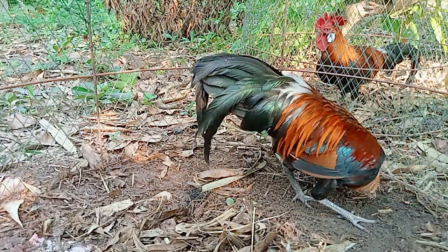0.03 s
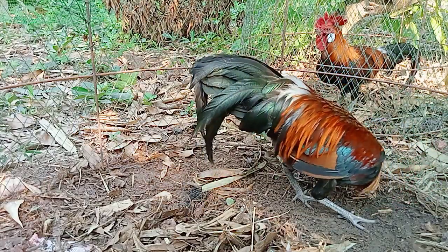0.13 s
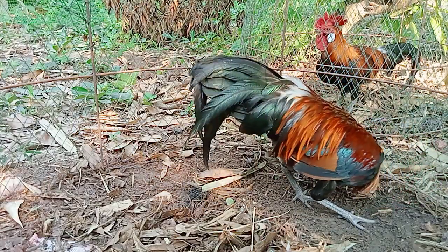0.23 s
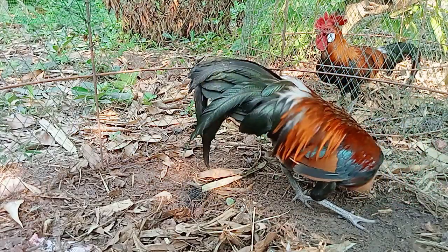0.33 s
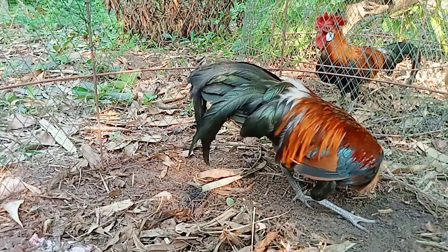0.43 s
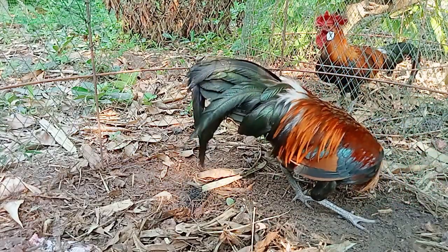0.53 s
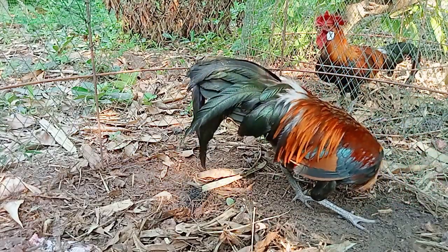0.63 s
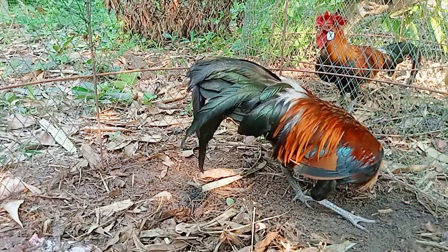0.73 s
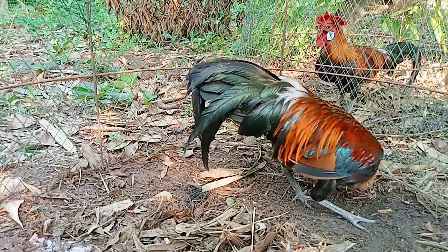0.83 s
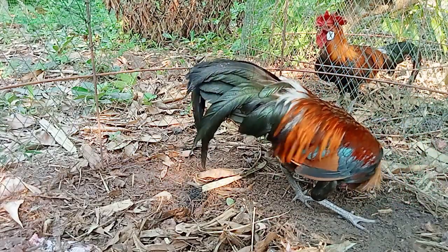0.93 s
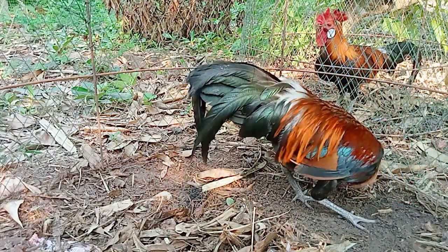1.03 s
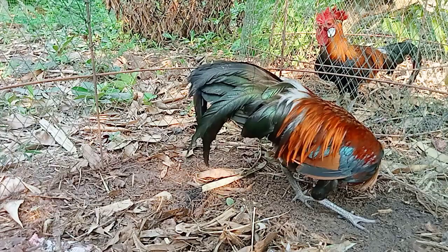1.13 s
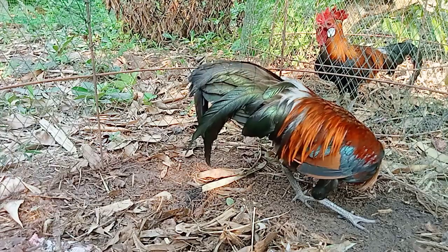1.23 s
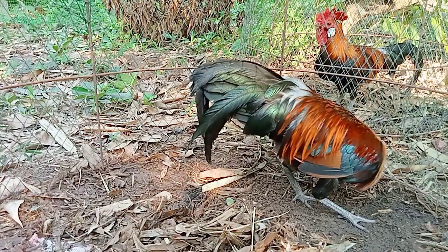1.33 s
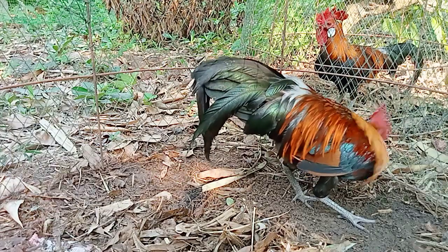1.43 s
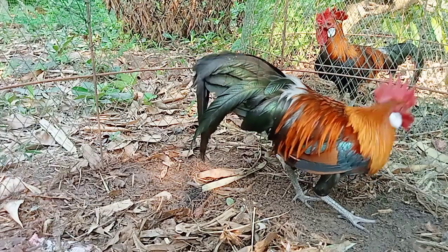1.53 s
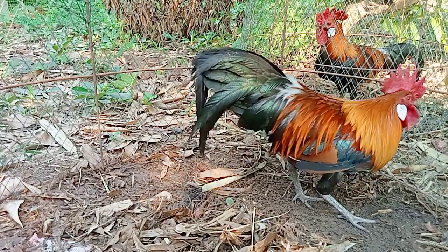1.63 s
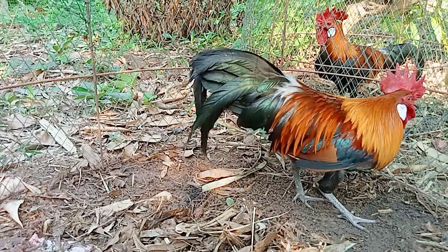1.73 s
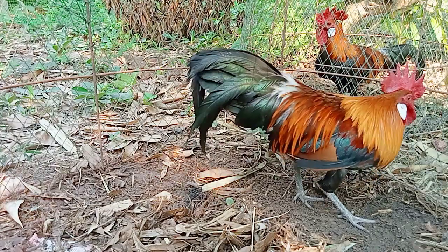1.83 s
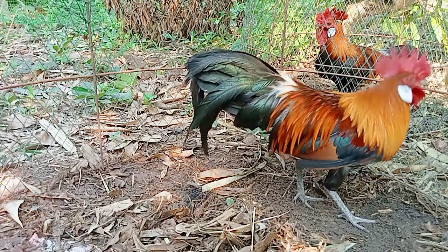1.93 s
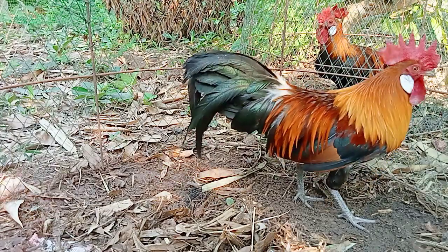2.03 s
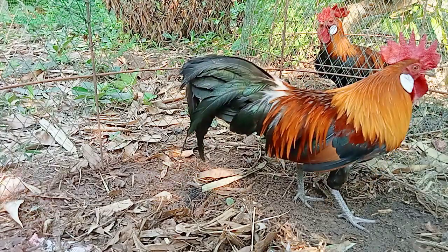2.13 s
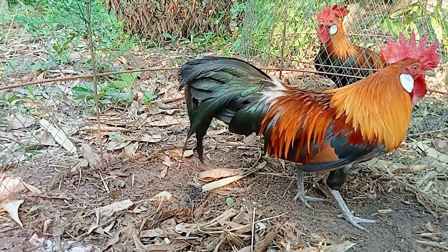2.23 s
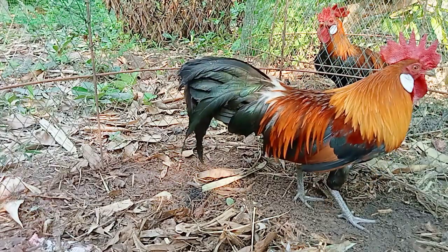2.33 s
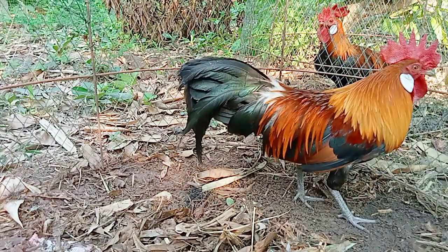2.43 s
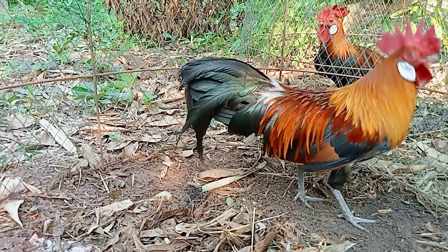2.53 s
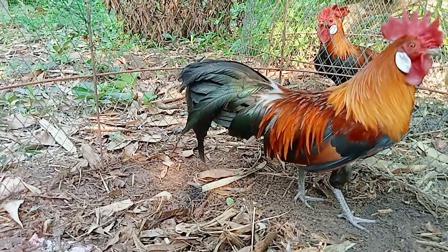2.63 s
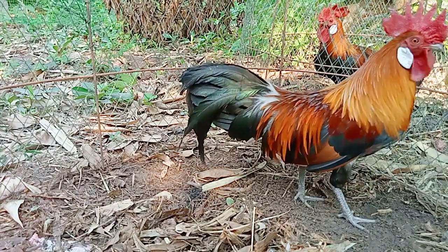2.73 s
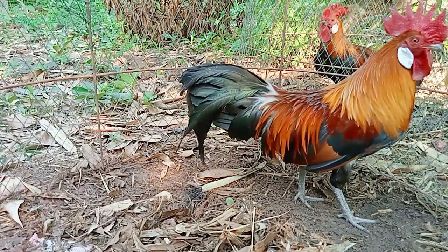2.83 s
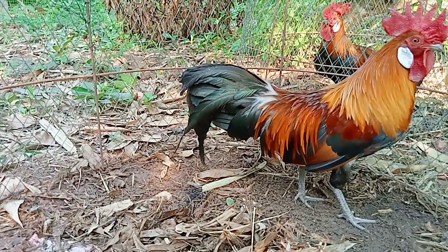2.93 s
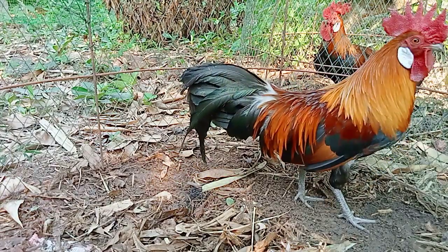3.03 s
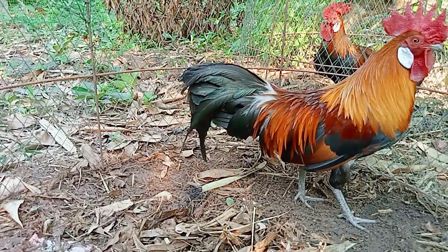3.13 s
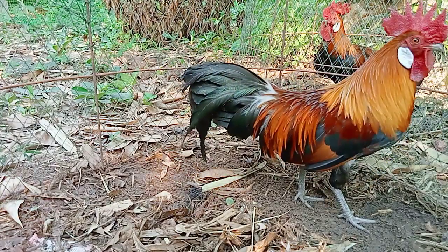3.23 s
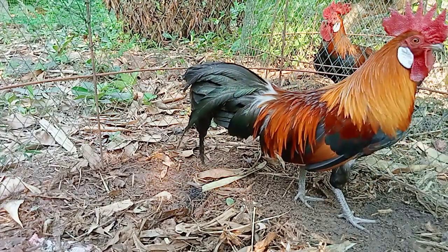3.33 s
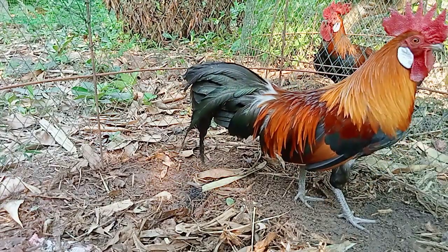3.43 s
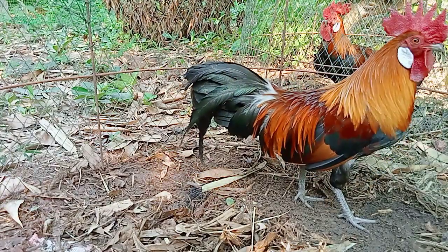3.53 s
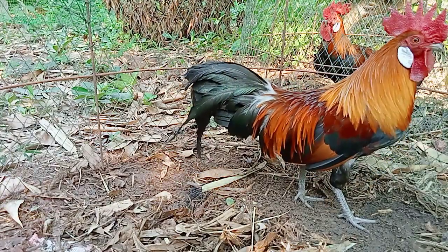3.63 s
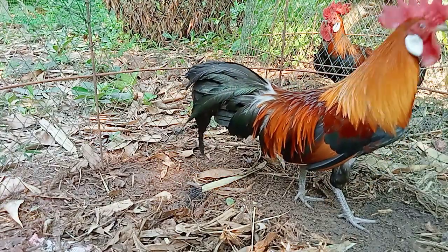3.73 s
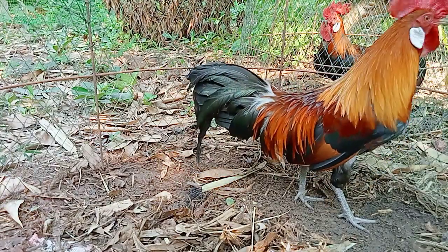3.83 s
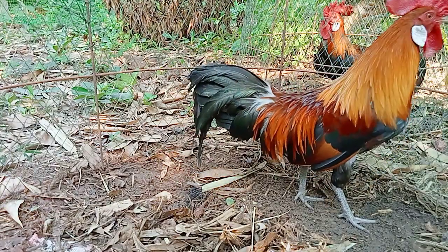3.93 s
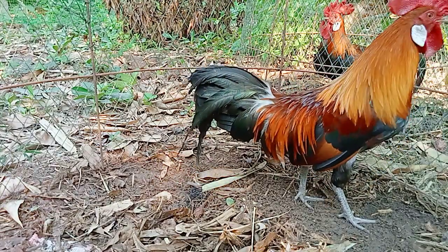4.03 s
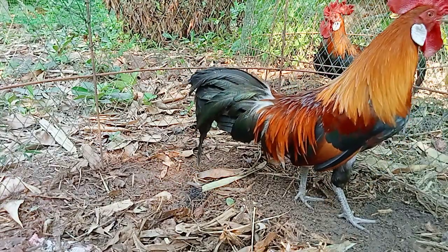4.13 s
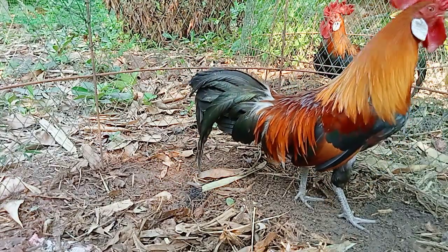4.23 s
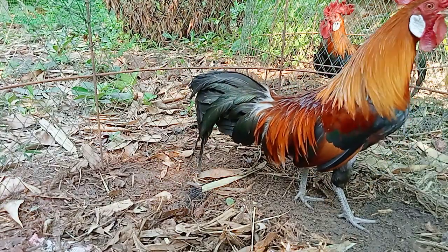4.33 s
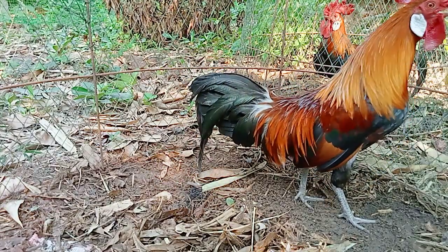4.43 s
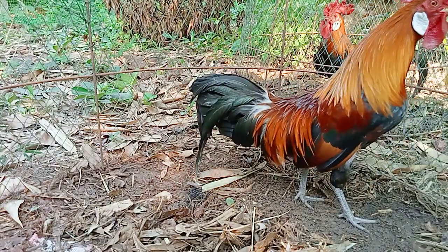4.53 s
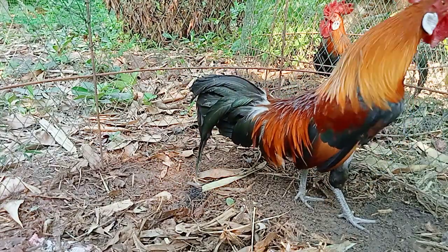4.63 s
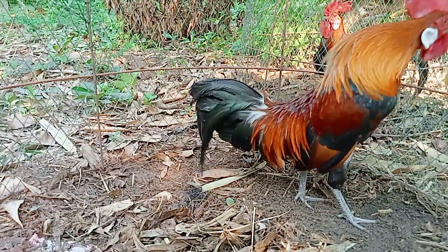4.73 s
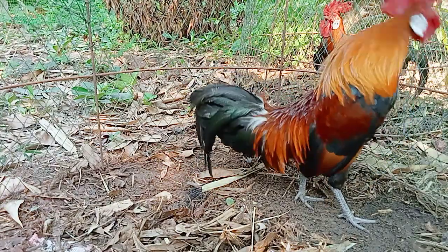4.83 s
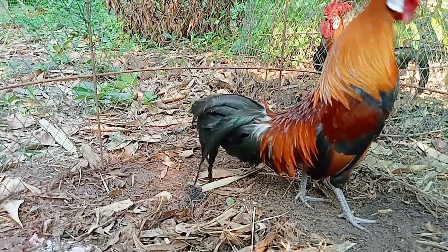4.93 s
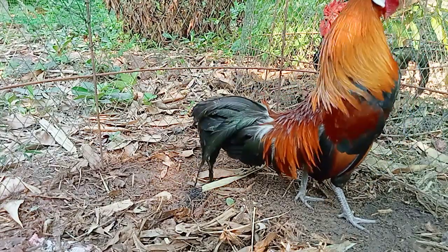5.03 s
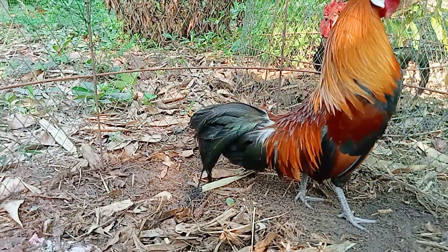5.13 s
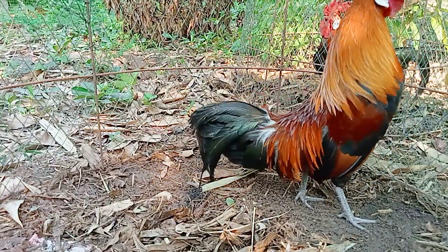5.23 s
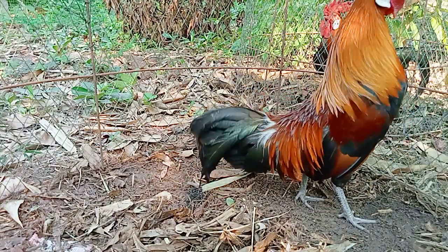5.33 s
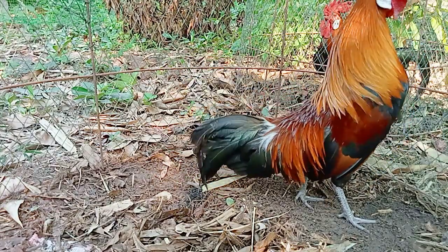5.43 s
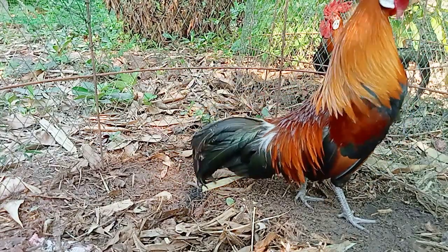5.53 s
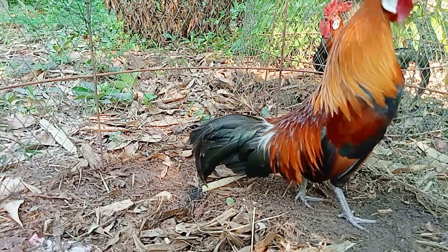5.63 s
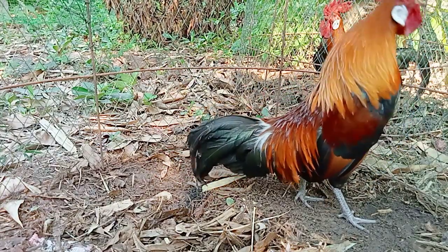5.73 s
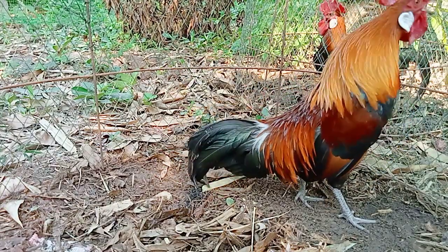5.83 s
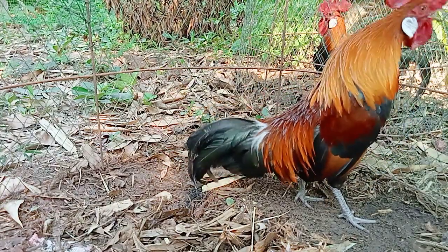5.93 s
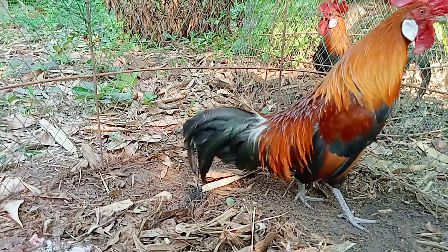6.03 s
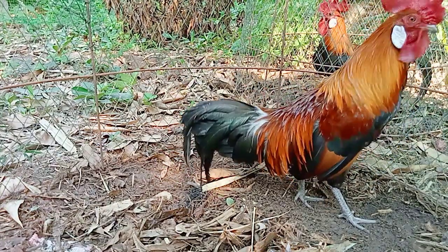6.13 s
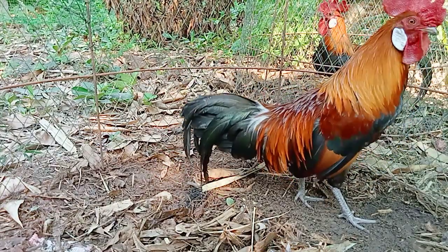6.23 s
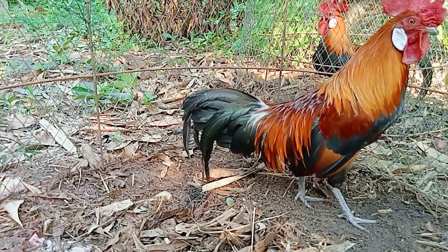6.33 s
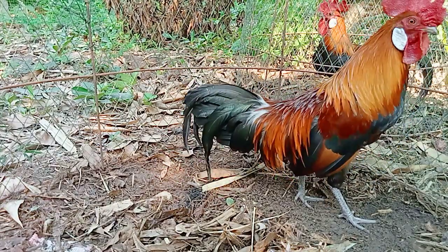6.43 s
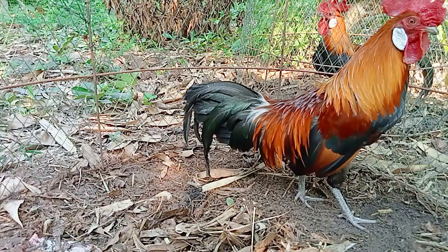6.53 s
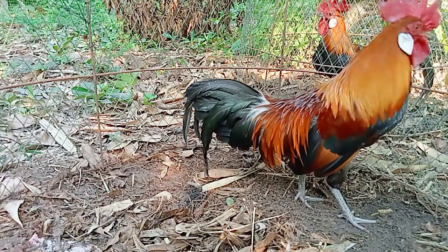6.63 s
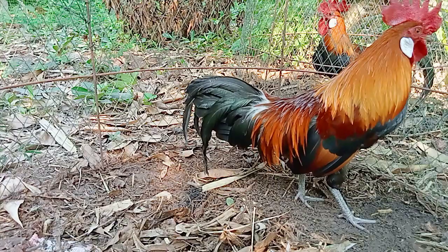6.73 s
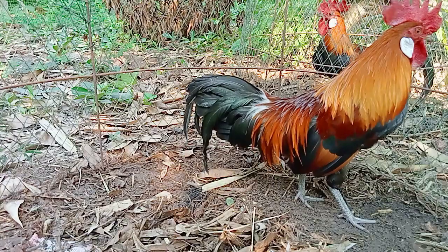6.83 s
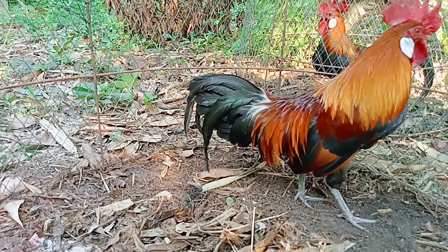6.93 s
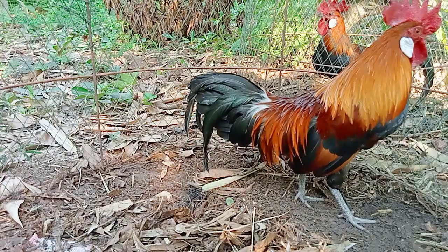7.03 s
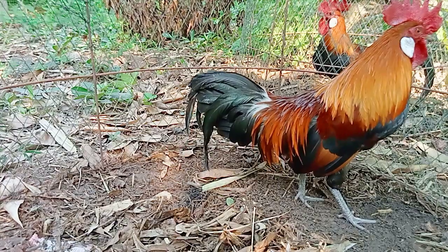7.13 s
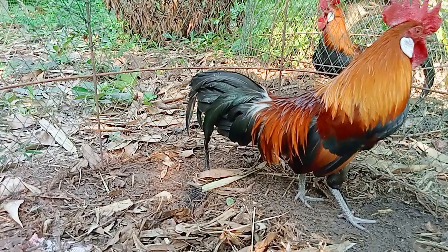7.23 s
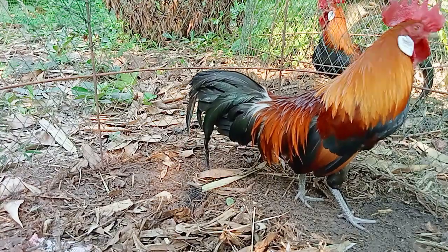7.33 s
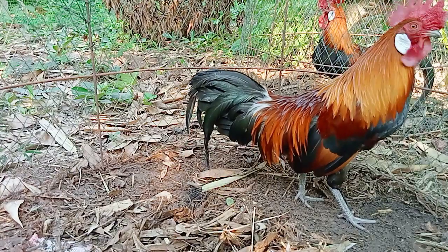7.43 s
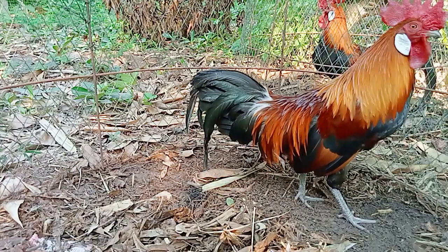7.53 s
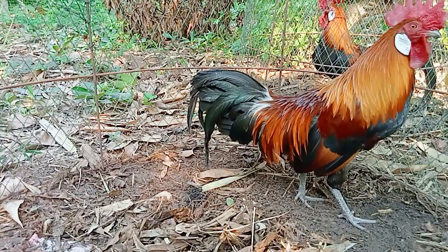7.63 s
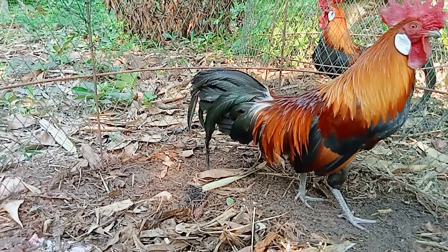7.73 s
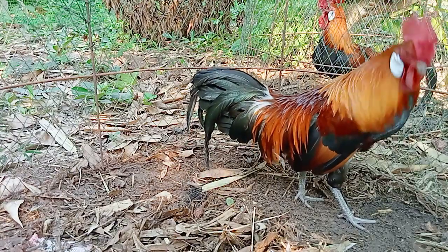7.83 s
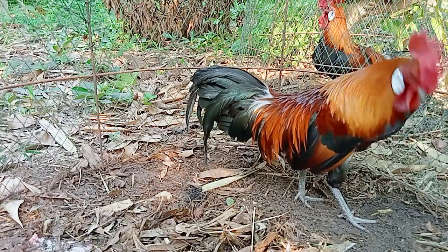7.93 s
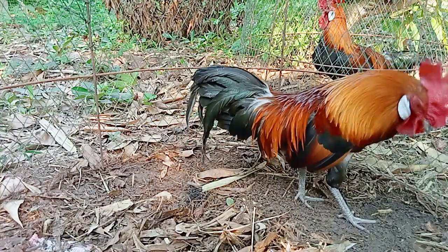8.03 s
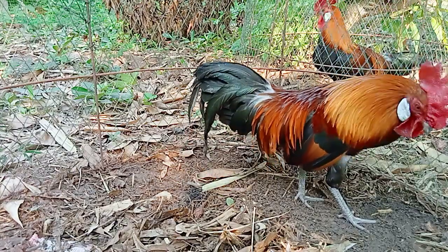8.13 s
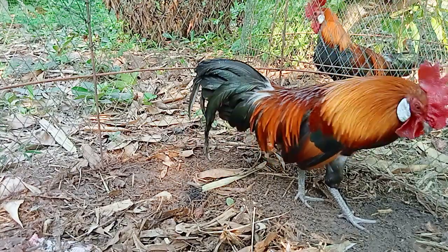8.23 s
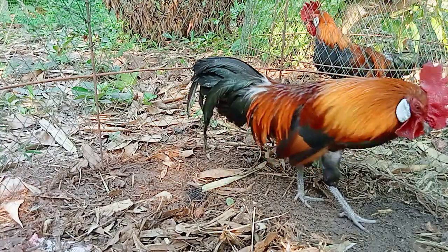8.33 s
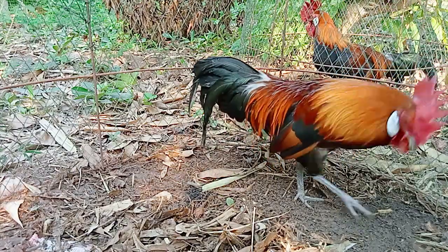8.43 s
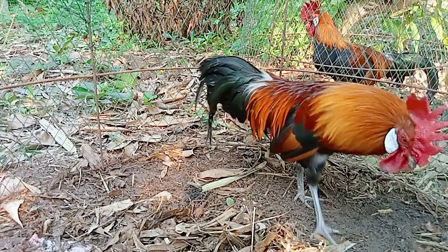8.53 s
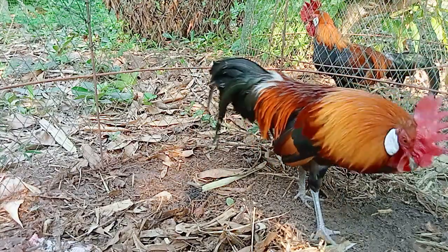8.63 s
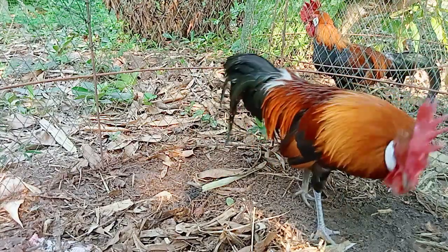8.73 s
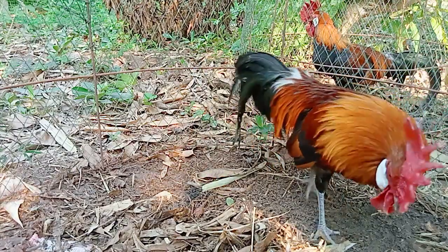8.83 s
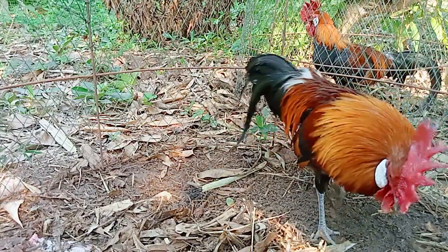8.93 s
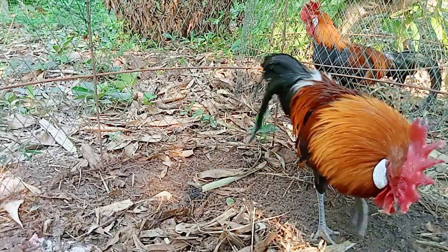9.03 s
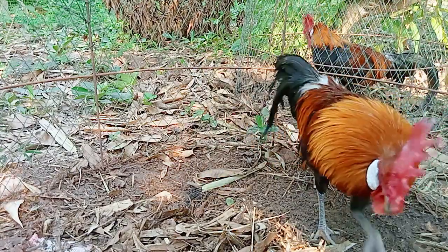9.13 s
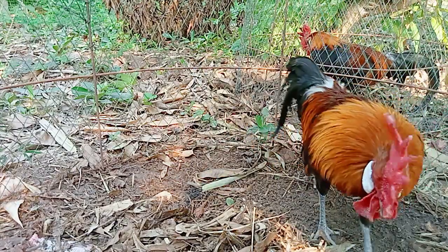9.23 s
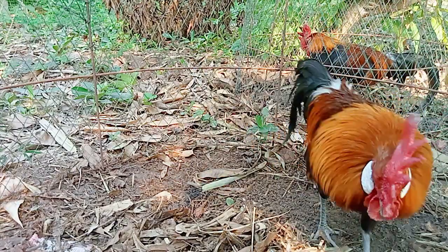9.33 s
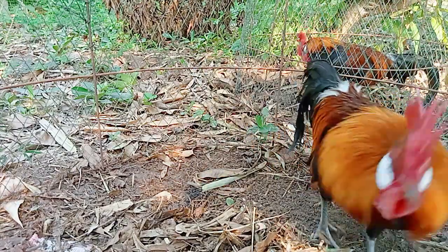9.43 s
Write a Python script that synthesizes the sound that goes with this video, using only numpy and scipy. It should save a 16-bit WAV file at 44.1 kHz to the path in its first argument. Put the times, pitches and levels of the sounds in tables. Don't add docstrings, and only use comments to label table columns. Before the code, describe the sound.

Outdoor garden pen, heard by a phone close to a rooster. Leafy hiss and low wind thumps come first, then a hen further off rises into a long hoarse note and cackles steadily. The near rooster bursts out four loud clipped notes, flipping between whistle and rasp. The background drops and stays quieter; a far rooster answers with three echoing notes among soft clucks, small chirps and leaf ticks.

```python
import sys
import numpy as np
from scipy import signal
from scipy.fft import rfft, irfft
from scipy.io import wavfile
from scipy.ndimage import uniform_filter1d

SR = 44100
rng = np.random.default_rng(int(sys.argv[2]) if len(sys.argv) > 2 else 0)


def inscribe(sig):
    pcm = np.round(np.clip(np.atleast_2d(sig).T, -1, 1) * 32767)
    wavfile.write(sys.argv[1], SR, pcm.astype(np.int16))


def volts(x):
    e = np.asarray(x, float) / 20
    return 10 ** e


N = 418068
TOP_HZ = 15450


def colour(x, shape):
    hz, db = np.transpose(shape)
    grid = np.maximum(np.arange(1025) * SR / 2048, 1)
    log_gain = np.interp(np.log(grid), np.log(hz), db) * np.log(10) / 20
    cepstrum = irfft(log_gain)
    cepstrum[1:1024] *= 2
    cepstrum[1025:] = 0
    response = irfft(np.exp(rfft(cepstrum)))
    return signal.fftconvolve(x, response)[:len(x)]


def unit(x):
    return x / np.sqrt(np.mean(x ** 2))


def walk(rate, size):
    hold = max(int(SR / rate), 1)
    levels = np.repeat(rng.standard_normal(size // hold + 1), hold)
    return unit(uniform_filter1d(uniform_filter1d(levels, hold), hold)[:size])


def follow(curve):
    return np.interp(np.arange(N) / SR, *np.transpose(curve))


def columns(note):
    times, *cols = np.transpose(note)
    at = np.arange(int(times[0] * SR), min(int(times[-1] * SR), N))
    return at, [np.interp(at / SR, times, col) for col in cols]


def band(x, lo_hz, hi_hz):
    return signal.sosfiltfilt(signal.butter(3, [lo_hz, hi_hz], "band", fs=SR, output="sos"), x)


def tail(x, t60, wet_db, echo_s, echo_db):
    t = np.arange(SR) / SR
    scattered = np.exp(-np.log(1000) * t / t60) * np.minimum(t / 0.028, 1)
    slap = volts(echo_db) * np.exp(-((t - echo_s) / 0.0061) ** 2)
    echoes = rng.standard_normal(SR) * (scattered + slap)
    return volts(wet_db) * signal.fftconvolve(x, echoes / np.sqrt(np.sum(echoes ** 2)))[:N]


def voice(hz, db, rasp, half, neck, throats, jitter, scatter, shimmer, breath):
    n = len(hz)
    rasp = rasp * volts(1.7 * walk(70, n))
    wobble = walk(700, n) + .7 * np.minimum(rasp, .6) * walk(160, n)
    phase = 2 * np.pi * np.cumsum(hz * (1 + jitter * rasp * wobble)) / SR
    phase = phase + scatter * rasp * walk(1300, n)
    phase = phase + .6 * half * np.sin(phase / 2)
    pulses = sum(np.cos(k * phase) * (k * hz < TOP_HZ) for k in range(1, 22)) / 3
    pulses = pulses * (1 + half * np.cos(phase / 2))
    pulses = pulses * (1 + shimmer * np.minimum(rasp, .5) * walk(450, n))
    source = pulses + breath * rasp * rng.standard_normal(n)
    sound = 0
    for k, shape in enumerate(throats):
        sound = sound + np.maximum(1 - abs(neck - k), 0) * unit(colour(source, shape))
    loudness = np.sqrt(uniform_filter1d(uniform_filter1d(sound ** 2, size=500), size=500))
    edge = np.minimum(np.minimum(np.arange(n), n - np.arange(n)) / (0.0009 * SR), 1)
    return sound / loudness * volts(db) * edge


def bursts(events, cycles, fall, lag):
    out = np.zeros(N)
    for s, db, hz in events:
        u = np.arange(int(cycles / hz * SR)) * hz / SR / cycles
        wave = np.sin(2 * np.pi * cycles * u * (1 + fall * (1 - u)))
        at = int((s + lag) * SR)
        out[at:at + len(u)] += volts(db) * np.sin(np.pi * u) ** 2 * wave
    return out


def slow_gain_db():
    return np.interp(np.arange(N) / SR, [2.9, 6.6], [0, -5.5])


def traffic():
    hum = colour(rng.standard_normal(N),
                 [(30, -30.5), (70, -9.0), (130, -6.5), (300, -9.0), (600, -10.0), (1500, -31.0)])
    return volts(-59.5) * unit(hum)


def garden():
    # (frequency [Hz], gain [dB])
    hiss_colour = [(88, -30.5), (150, -16.5), (253, -20.5), (381, -16.5), (632, -11), (1030, -13),
                   (1150, -11), (1990, -13), (4680, -6.5), (5250, -8.5), (7170, 2), (8380, -11.5),
                   (9980, -18.5), (12100, -21), (15600, -12.5)]
    # (time [s], level [dB])
    breeze = [(0.0, -2), (0.5, -1), (0.8, -0.5), (1.25, 1), (2.0, 1), (2.7, 1), (3.2, -0.5), (3.55, 0),
              (3.82, 2.5), (4.1, 0), (4.45, 1), (6.3, 1), (6.6, -1), (6.951, 1.5), (7.4, -1.7), (9.16, -1),
              (9.45, 0.5)]
    hiss = unit(colour(rng.standard_normal(N), hiss_colour))
    low = signal.sosfilt(signal.butter(2, 1500, fs=SR, output="sos"), hiss)
    rest = hiss - low
    high = signal.sosfilt(signal.butter(2, 5000, "high", fs=SR, output="sos"), rest)
    middle = rest - high
    flicker = low * volts(1.3 * walk(9, N)) + middle * volts(.8 * walk(11, N)) + high * volts(1.1 * walk(14, N))
    level_db = -39.5 + follow(breeze) + slow_gain_db() + 0.42 * walk(5.9, N)
    return flicker * volts(level_db)


def wind():
    # (time [s], level [dB])
    gusts = [(0.0, -52), (0.4, -53), (1.15, -46), (1.6, -50), (1.95, -56), (2.4, -50), (3.25, -44.5),
             (3.72, -47), (4.25, -52), (4.65, -58.5), (5.25, -72), (6.071, -72), (6.4, -62), (9.48, -57.5)]
    # (time [s], peak level [dB], pitch [Hz])
    thumps = [(0.088, -35, 99), (0.387, -35, 111), (0.619, -39, 114), (0.652, -40, 109), (0.698, -30, 111),
              (0.741, -29, 103), (0.845, -34, 114), (0.87, -43, 100), (0.968, -35, 97), (1.017, -43, 101),
              (1.042, -34, 97), (1.07, -33, 86), (1.11, -31, 95), (1.143, -37, 96), (1.241, -38, 89),
              (1.34, -40, 102), (1.449, -42, 90), (1.506, -40, 88), (1.58, -33, 96), (1.606, -37, 114),
              (1.719, -38, 113), (1.776, -36, 102), (1.797, -43, 91), (1.832, -39, 91), (2.047, -37, 87),
              (2.094, -36, 102), (2.179, -38, 108), (2.301, -36, 79), (2.366, -34, 140), (2.589, -34, 93),
              (2.679, -26, 108), (2.73, -35, 105), (2.773, -38, 110), (2.804, -42, 82), (2.849, -41, 81),
              (2.935, -41, 92), (2.959, -38, 93), (2.992, -36, 88), (3.128, -31, 92), (3.153, -35, 87),
              (3.204, -32, 80), (3.253, -32, 100), (3.319, -33, 99), (3.356, -36, 97), (3.382, -39, 94),
              (3.424, -35, 92), (3.513, -34, 79), (3.555, -40, 109), (3.582, -31, 79), (3.615, -35, 96),
              (3.673, -35, 107), (3.702, -29, 111), (3.894, -34, 97), (4.068, -42, 120), (4.159, -35, 87),
              (4.218, -42, 100), (4.322, -40, 86), (4.348, -41, 93), (4.402, -42, 97), (4.553, -42, 87)]
    rumble = colour(rng.standard_normal(N),
                    [(15, -49.5), (40, -11.5), (80, 1.5), (130, -6.5), (220, -15.5), (500, -45.5)])
    level_db = follow(gusts) + slow_gain_db() - 3.5
    level_db = level_db + 3.5 * walk(40, N) + 1.2 * walk(9, N)
    return unit(rumble) * volts(level_db) + bursts(thumps, cycles=2.22, fall=0.082, lag=0.0001)


def ticks():
    # (time [s], peak level [dB])
    snaps = [
        (1.387, -22),
        (1.917, -26),
        (3.7307, -37),
        (6.769, -33),
        (6.9234, -30),
        (7.8629, -34.5),
        (8.786, -23),
        (9.4177, -23),
    ]
    out, t = np.zeros(N), np.arange(800) / SR
    for s, db in snaps:
        crack = rng.standard_normal(len(t)) * np.exp(-t / 0.0044)
        at = int(s * SR)
        out[at:at + len(t)] += volts(db - 17.5) * crack
    return out


def clucks():
    # (time [s], peak level [dB], pitch [Hz])
    mutters = [(1.202, -51, 577), (1.382, -44, 576), (3.898, -44, 510), (4.206, -45, 427),
               (4.584, -43, 450), (6.036, -46.5, 344), (6.798, -46, 684), (7.404, -46.5, 450),
               (8.0, -44, 467), (8.395, -41, 547), (9.352, -42.5, 525)]
    return bursts(mutters, cycles=7.15, fall=0.65, lag=-0.0006)


def birds():
    # (time [s], length [s], first pitch [Hz], last pitch [Hz], peak level [dB])
    glides = [
        (4.674, 0.096, 650, 1095, -61),
        (6.533, 0.08, 1268, 1380, -56),
        (7.506, 0.1, 1560, 1446, -59),
        (7.533, 0.065, 2060, 1790, -62),
        (9.165, 0.045, 1220, 1397, -64.5),
        (6.79, .14, 3920, 3530, -61),
        (7.254, 0.14, 3730, 3450, -60.5),
        (9.226, 0.11, 3900, 3440, -57),
    ]
    out = np.zeros(N)
    for s, length, first, last, peak in glides:
        share = np.array([0, 0.57, 1])
        level_db = peak - 5.5 * np.array([1, 0, 1])
        at, (hz, db) = columns(np.c_[s + length * share, first + (last - first) * share, level_db])
        flutter = 1 + 95 / hz * walk(400, len(at))
        whistle = np.sin(2 * np.pi * np.cumsum(hz * flutter) / SR)
        out[at] += volts(db + 4.5) * (2.0 + walk(141, len(at))) * whistle
    return out + tail(out, t60=.2, wet_db=-7, echo_s=.05, echo_db=-12)


def far_fowl(notes, throat, rasp, scatter, t60, wet_db, echo_db):
    out = np.zeros(N)
    for note in notes:
        at, (hz, db) = columns(note)
        out[at] += voice(hz / 2, db, rasp, .05, 0, [throat], jitter=.05, scatter=scatter, shimmer=.8, breath=.55)
    return out + tail(out, t60, wet_db, 0.031, echo_db)


def far_rooster():
    # (time [s], second harmonic [Hz], level [dB])
    answer = [
        [(7.738, 1450, -51), (7.747, 1698, -45), (7.761, 2177, -37), (7.772, 2310, -37), (7.803, 2160, -37.5),
         (7.82, 1745, -41.5), (7.835, 1560, -40)],
        [(7.921, 1530, -52), (7.928, 1597, -41), (7.944, 2152, -45), (7.956, 2246, -34.5), (8.1, 2180, -37.5),
         (8.15, 1880, -39), (8.175, 1593, -44), (8.185, 1500, -50)],
        [(8.313, 1463, -53), (8.33, 1720, -43), (8.348, 2120, -36), (8.376, 2170, -37.5), (8.448, 1920, -37.5),
         (8.475, 1755, -43.5), (8.49, 1537, -42), (8.515, 1470, -64)],
    ]
    # (frequency [Hz], gain [dB])
    far_throat = [(800, -18), (1100, -12.5), (1350, -5), (1650, -1.5), (2200, 0), (2650, -22),
                  (3000, -11.5), (3250, -20), (3550, -7.5), (4100, -25), (4500, -18), (6000, -47)]
    return far_fowl(answer, far_throat, rasp=.38, scatter=.65, t60=.42, wet_db=-5, echo_db=-3)


def hen():
    # (time [s], second harmonic [Hz], level [dB])
    opener = [
        [(1.09, 1510, -55), (1.2, 1730, -57), (1.23, 1740, -57)],
        [(1.235, 1357, -53), (1.3, 1447, -47.5), (1.39, 1584, -42.5), (1.47, 1682, -42.5), (1.75, 1839, -38.5),
         (1.82, 1846, -44.5), (1.845, 1780, -66)],
    ]
    # (frequency [Hz], gain [dB])
    hen_throat = [(500, -37), (900, -12.5), (1200, -15), (1500, 5.5), (1850, 5), (2300, -12.5),
                  (3600, -16.5), (5000, -48)]
    # (time [s], top of second harmonic [Hz], climb [share of pitch], level [dB], depth of the arch [0-1])
    cackle = [(1.871, 1730, 0.0865, 0.5, 0.28), (2.07, 1808, -0.039, 2, 0.03), (2.243, 1850, 0.067, 0, 0.7),
              (2.414, 1810, 0.054, 0.5, 0.54), (2.578, 1793, -0.0019, -1, 0.99),
              (2.739, 1842, 0.075, -1, .9), (2.903, 1830, -0.067, -1, 1), (3.062, 1810, -0.041, -0.5, 0.65),
              (3.223, 1820, 0.0048, 0, 0.88), (3.372, 1860, -0.094, -1.5, 1.1),
              (3.533, 1820, 0.01, -0.5, 0.94), (3.698, 1845, -.08, -0.5, 1.08),
              (3.866, 1757, 0.032, -0.5, 0.56), (4.005, 1798, -0.016, -0.5, 0.98), (4.166, 1760, 0, 0, 1)]
    # (share of its length [0-1], pitch [ratio], level [dB])
    arch_shape = [
        (0, .85, 0),
        (0.09, 0.95, 1.5),
        (.45, 1, 6),
        (.8, .98, 2),
        (1, 0.97, -4),
    ]
    syllables = []
    for (s, hz, climb, db, arch), (next_s, *_) in zip(cackle, cackle[1:]):
        length = 0.855 * (next_s - s)
        level_db = -44 + db - 0.04 * (s - cackle[0][0])
        syllables.append([(s + u * length, hz * ratio ** arch * (1 + climb * (u - .5)), level_db + shape_db)
                          for u, ratio, shape_db in arch_shape])
    return far_fowl(opener + syllables, hen_throat, rasp=.5, scatter=.4, t60=.17, wet_db=-6, echo_db=-20)


def rooster():
    # (time [s], upper-register pitch [Hz], level [dB])
    crow = [
        [(4.853, 900, -29), (4.859, 882, -12), (4.872, 944, -16), (4.89, 1028, -9.5), (4.925, 1077, -10),
         (5.015, 1061, -12), (5.03, 953, -20.5), (5.045, 940, -29.5), (5.075, 940, -45)],
        [(5.153, 940, -40), (5.157, 967, -16), (5.17, 1087, -11.5), (5.178, 1105, -7), (5.195, 1132, -12),
         (5.255, 1087, -9), (5.268, 1035, -7), (5.28, 953, -23.5), (5.31, 940, -42.5)],
        [(5.325, 1023, -33.5), (5.339, 1000, -16), (5.378, 1082, -9), (5.39, 1075, -12.5), (5.445, 1099, -10.5),
         (5.568, 1055, -12.5), (5.58, 934, -14), (5.6, 878, -19.5), (5.65, 906, -36.5)],
        [(5.764, 989, -29), (5.774, 981, -16), (5.85, 1015, -11), (5.95, 1002, -8), (5.998, 974, -11.5),
         (6.007, 945, -14), (6.022, 855, -17), (6.045, 593, -29.5), (6.06, 307, -39)],
    ]
    # (time [s], glide back [s], pitch at the restart [ratio], depth of the break [dB])
    slips = [(4.897, .006, .82, -10), (4.907, .012, .8, -5), (4.934, .005, .9, -12), (4.952, .006, .9, -6),
             (4.977, .008, .76, -8), (4.999, .014, .78, -13), (5.009, .003, .95, -4),
             (5.021, .006, .88, -10), (5.455, .008, .9, -2), (5.513, .009, .82, -8),
             (5.527, .003, 1.04, -4), (5.541, .006, .92, -8), (5.548, .004, .92, -10),
             (5.571, .004, .95, -12), (5.597, .005, .9, -12), (5.781, .005, .9, -6),
             (5.801, .004, 1.08, -8), (5.818, .004, .95, -5)]
    # (frequency [Hz], gain [dB])
    throat_1 = [
        [(180, -72), (300, -30.5), (652, -47.5), (835, 0), (1030, -1.5), (1620, -11.5), (2000, -3.5), (2500, -37), (3230, -11.5), (4140, -7.5), (5950, -38), (8140, -12.5), (9000, -38), (9900, -31), (15500, -41.5)],
        [(290, -80), (500, -55), (901, -3), (1100, -1.5), (1240, -24), (1740, -19), (1990, 1), (2150, -13), (2330, -35.5), (3150, -10.5), (4130, -9.5), (4750, -9), (5450, -37), (7780, -11.5), (9240, -41), (15500, -30)],
        [(290, -88.5), (500, -45), (863, -5.5), (1040, -9), (1370, -7.5), (1700, -14.5), (1980, -4.5), (2290, -37), (3240, -8.5), (4700, -16), (5280, -38.5), (6930, -10.5), (7890, -32), (15500, -33)],
    ]
    throat_2 = [
        [(350, -72.5), (600, -49.5), (902, -6), (1410, -13), (1780, -17.5), (2790, -19), (3330, -36), (3570, -27), (6760, -34), (7540, -6.5), (9760, -69), (15500, -43.5)],
        [(470, -36.5), (800, -8), (1160, 2), (1510, -41), (2300, -12.5), (2540, -46.5), (3460, -23), (4010, -50), (4540, -11), (6110, -36.5), (7930, -8), (8650, -37), (15500, -33.5)],
        [(470, -56.5), (800, -14), (1120, -8), (1300, -33), (2160, -15), (2410, -24), (3330, -25.5), (4010, -37.5), (5470, -18.5), (5970, -38.5), (7740, -10), (8550, -42), (15500, -41)],
    ]
    throat_3 = [
        [(350, -95), (600, -54.5), (902, -9.5), (1120, -15.5), (1810, -15), (2340, -34.5), (2680, -16), (2990, -31.5), (6760, -31), (7640, -11), (9240, -54.5), (15500, -38)],
        [(350, -90.5), (600, -36), (1080, -6.5), (1320, -22.5), (2130, -14.5), (2600, -26), (3250, -32), (3800, -40.5), (4400, -29.5), (5400, -20.5), (6000, -41), (7640, -20.5), (8990, -47.5), (15500, -42)],
        [(350, -88.5), (600, -36.5), (1080, -6.5), (1320, -22.5), (2130, -15), (2400, -25.5), (2750, -18.5), (3200, -37), (3710, -23.5), (4140, -47.5), (5150, -21), (6670, -37), (7640, -14), (8990, -53.5), (15500, -42)],
    ]
    throat_4 = [
        [(240, -75), (400, -51), (663, -35), (900, 3.5), (1130, -23.5), (2030, 10), (2880, -39.5), (3360, -20), (4770, -7), (5480, -31), (6280, -2), (6890, -28), (15500, -51)],
        [(470, -60.5), (800, -16), (1030, -17), (1450, -23), (2030, -7.5), (2350, -59.5), (2660, -88), (2940, -32), (3960, -23), (5080, -28.5), (5470, -63.5), (6110, -28), (7000, -32), (8000, -42), (11000, -45.5), (15500, -48.5)],
        [(120, -94), (200, -80), (842, -0.5), (1680, -18), (2020, -13), (2380, -45), (2700, -19), (3550, -9.5), (5490, -38.5), (6300, -43), (7760, -2), (8600, -51.5), (10500, -32), (15500, -46)],
    ]
    # (frequency [Hz], gain [dB])
    beaks = [
        [(8000, 0.5), (9000, -3), (9350, -17.5), (9800, 5), (11200, -3.5), (12800, -0.5), (13600, 8.5),
         (14300, 2.5), (15500, -0.5)],
        [(8000, 0.5), (8700, 1.5), (9400, 3), (10700, -10.5), (11900, -2), (13400, -7.5), (14800, 7),
         (15500, -4)],
        [(8000, 1), (8600, 7), (9300, -4.5), (10300, -2), (11300, -1), (12500, 7), (14000, -2.5), (15500, -4)],
        [(8000, 1.5), (9300, 0), (10500, -3), (11300, -4), (12400, -3.5), (14200, 8), (15500, -3.5)],
    ]
    # (leap up [s], neck position before it [0-1], starts sinking [s], sunk [s],
    # half-pitch share when clear [0-1])
    necks = [
        (4.894, 0, 4.92, 5.015, .08),
        (5.176, .45, 5.225, 5.255, .003),
        (5.385, 0, 5.436, 5.45, .05),
        (5.833, .45, 6.003, 6.024, .13),
    ]
    # (from time [s], rasp [0-1])
    rasp_steps = [(4.85, .85), (4.865, .12), (4.894, .55), (5.022, 1), (5.16, .45), (5.172, .15),
                  (5.18, .4), (5.188, .012), (5.255, .08), (5.268, .8), (5.3, .9), (5.347, .28),
                  (5.364, .05), (5.383, .4), (5.392, .26), (5.412, .16), (5.443, .5), (5.466, .38),
                  (5.503, .58), (5.588, .9), (5.76, .8), (5.835, .55), (5.845, .34), (5.875, .25),
                  (5.889, .012), (5.91, .005), (6.004, .25), (6.018, .8)]
    # (from [Hz], to [Hz])
    top_ranges = [
        (5600, 8800),
        (8800, 11700),
        (11700, 16000),
    ]
    low_register, leap_s, break_s = .87, .006, .0035

    since, held = np.transpose(rasp_steps)
    row = np.maximum(np.searchsorted(since, np.arange(N) / SR) - 1, 0)
    rough = uniform_filter1d(held[row], size=int(.008 * SR))
    out = np.zeros(N)
    all_throats = [throat_1, throat_2, throat_3, throat_4]
    for note, throats, beak, (leap, drawn, sinks, sunk, half) in zip(crow, all_throats, beaks, necks):
        at, (hz, db) = columns(note)
        t = at / SR
        leap_ends = [leap - leap_s / 2, leap + leap_s / 2]
        hz = hz * np.interp(t, leap_ends, [low_register, 1])
        break_db = np.zeros(len(at))
        for s, climb, ratio, depth_db in slips:
            distance = np.where(t > s, (t - s) / climb, (s - t) / break_s)
            hz = hz * ratio ** np.exp(-distance ** 2)
            break_db += depth_db * np.exp(-((t - s) / break_s) ** 2)
        neck = np.interp(t, leap_ends + [sinks, sunk], [drawn, 1, 1, 2])
        half = half + .4 * rough[at] ** 3
        sung = voice(hz, db, rough[at], half, neck, throats, jitter=.05, scatter=.45, shimmer=.6, breath=.25)
        sung = colour(np.tanh(1.2 * sung) * .92, beak)
        chest = band(sung, 300, 1400)
        patches = sum(band(sung, *top) * (volts(2.5 * walk(40, len(at))) - 1) for top in top_ranges)
        out[at] += chest * volts(break_db) + (sung - chest + patches) * volts(.08 * break_db)
    return signal.sosfilt(signal.butter(4, 340, "high", fs=SR, output="sos"), out)


def pen_echoes(crow):
    # (frequency [Hz], gain [dB])
    pen_colour = [(500, -7), (1000, -4), (2100, -4), (2700, -4), (3600, 5), (4300, -3.5), (6000, -3.5),
                  (15000, -12.5)]
    echoes = tail(colour(crow, pen_colour), t60=0.49, wet_db=-14, echo_s=0.175, echo_db=-20)
    return echoes * volts(3 * walk(30, N))


def quick_gain_db(crow):
    lead_s, release_s = .003, .1
    loud = np.roll(uniform_filter1d(np.abs(crow), size=400) > .03, -int(lead_s * SR))
    keep = np.exp(-1 / (release_s * SR))
    release = signal.lfilter([1 - keep], [1, -keep], loud)
    return -9 * np.maximum(uniform_filter1d(1. * loud, size=200), release)


def scene():
    crow = rooster()
    behind = garden() + traffic() + pen_echoes(crow)
    small = birds() + clucks() + ticks()
    mix = crow + hen() + far_rooster() + small + wind() + behind * volts(quick_gain_db(crow))
    return mix[None]


def top_cut(x):
    return signal.sosfilt(signal.butter(12, 16510, fs=SR, output="sos"), x)


def record(dry):
    no_bass = signal.sosfilt(signal.butter(2, 45, "high", fs=SR, output="sos"), dry)
    finished = signal.sosfilt(signal.ellip(10, .2, 70, TOP_HZ, fs=SR, output="sos"), no_bass)
    return top_cut(finished)


dry = scene()
out = record(dry)
inscribe(out)
```